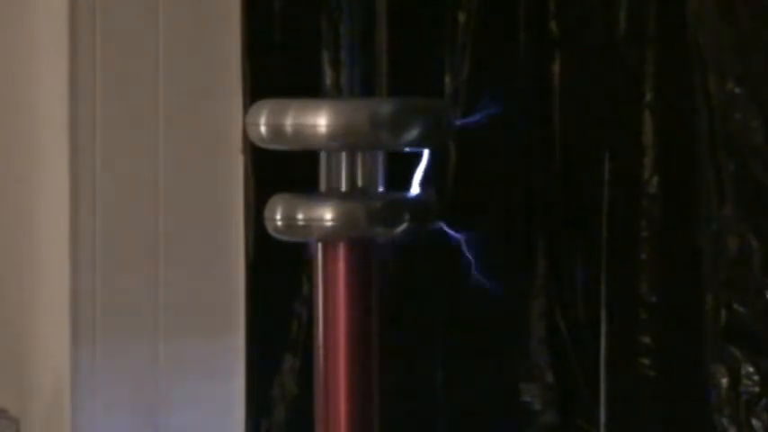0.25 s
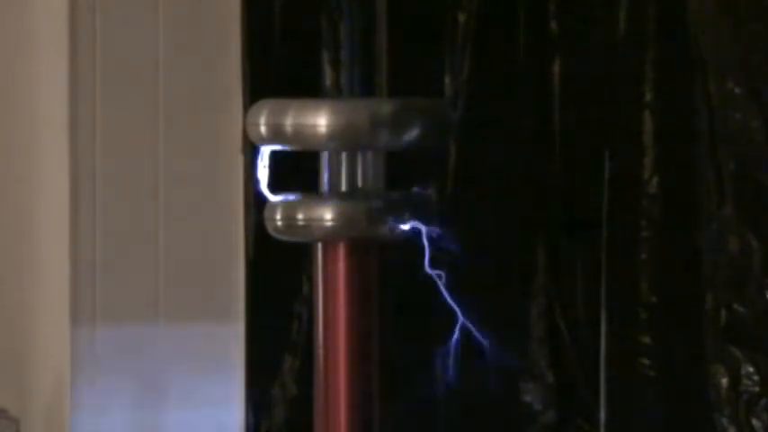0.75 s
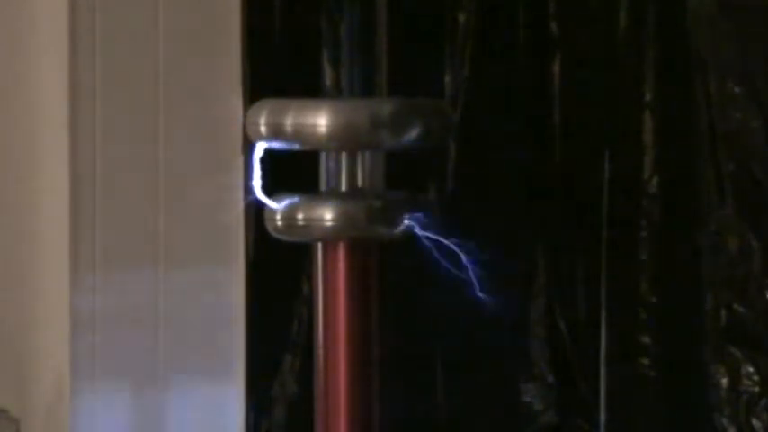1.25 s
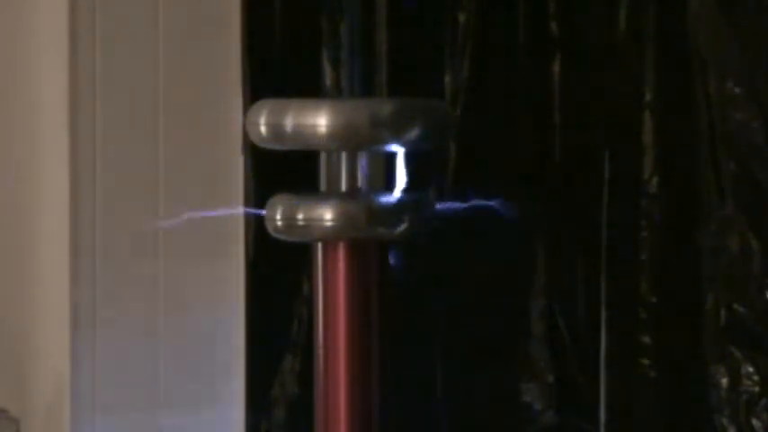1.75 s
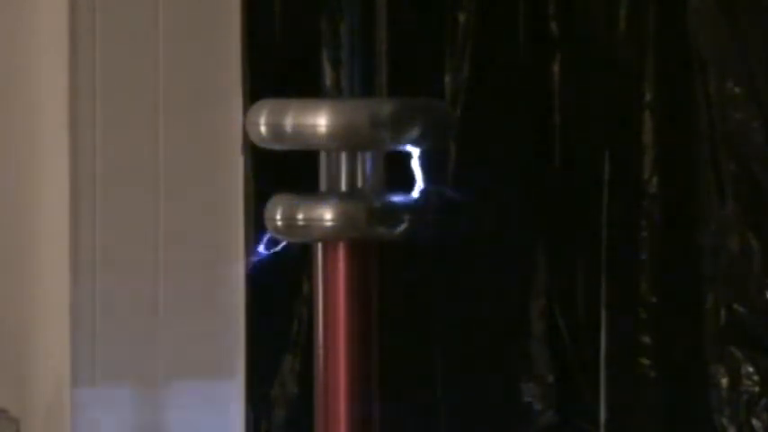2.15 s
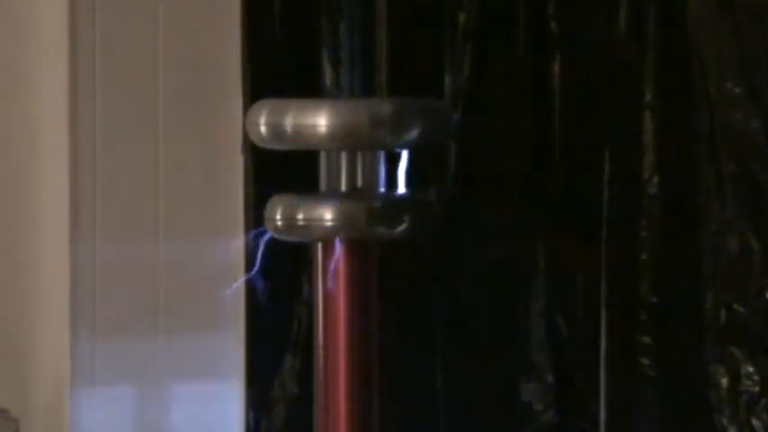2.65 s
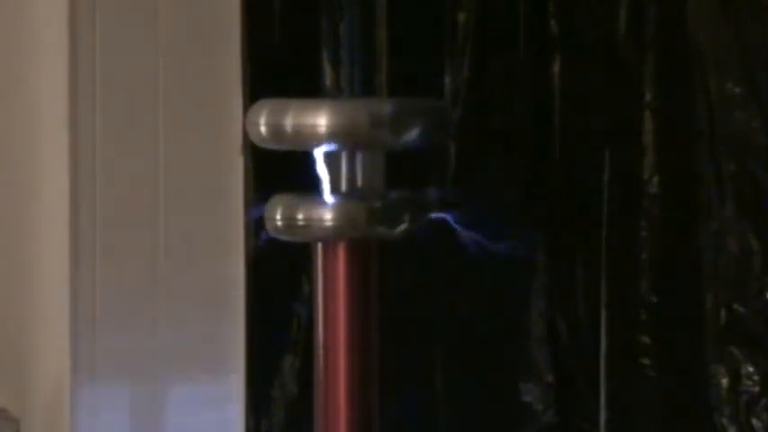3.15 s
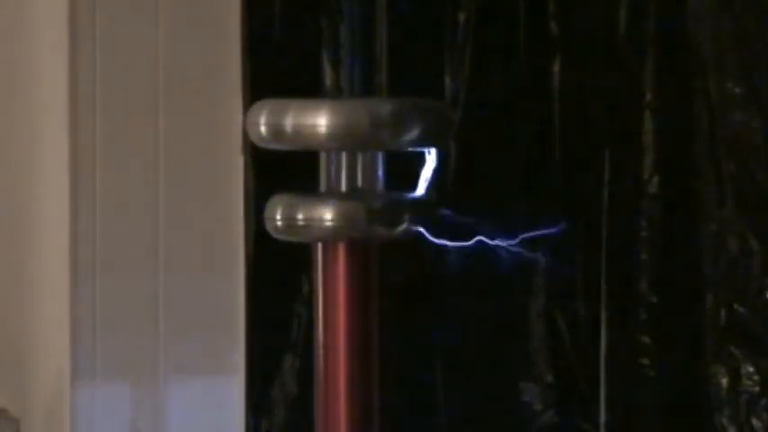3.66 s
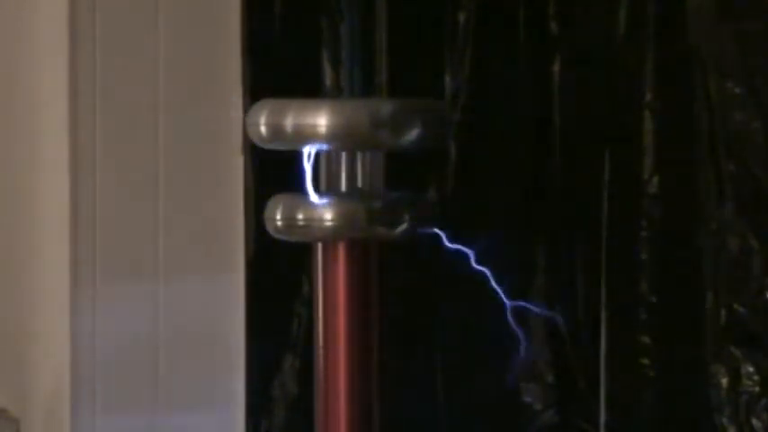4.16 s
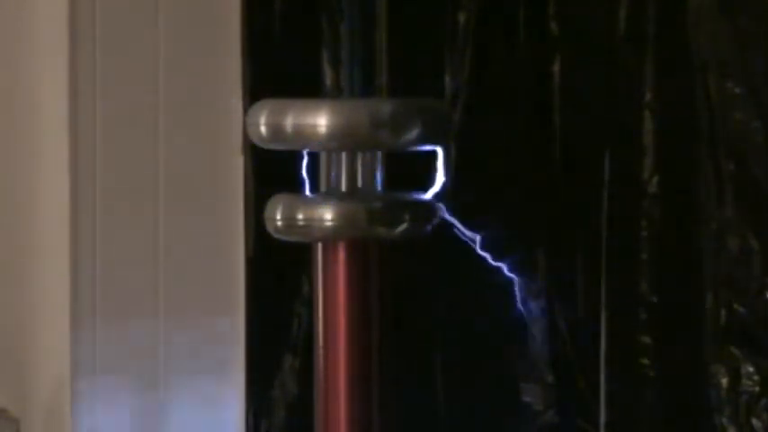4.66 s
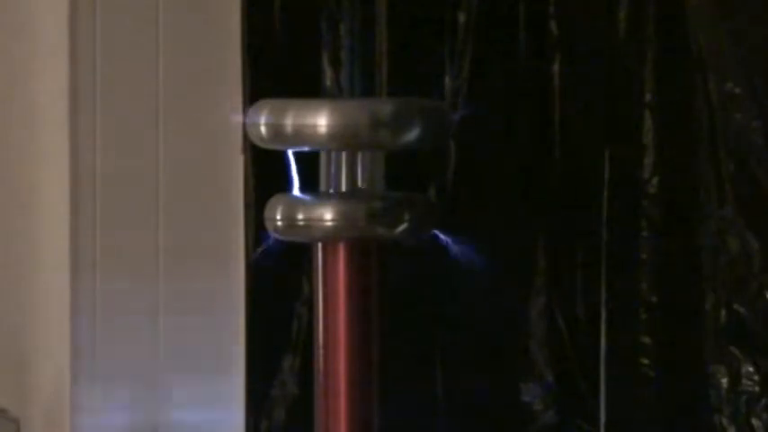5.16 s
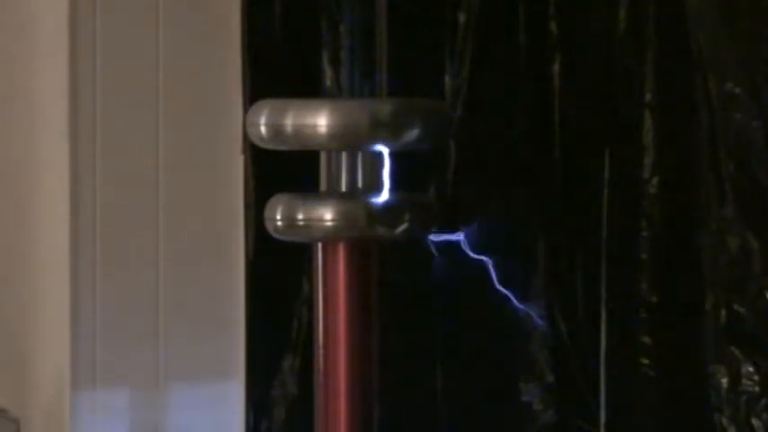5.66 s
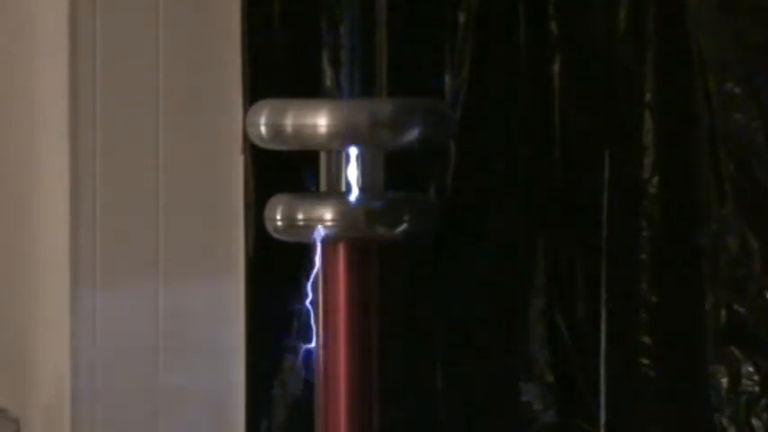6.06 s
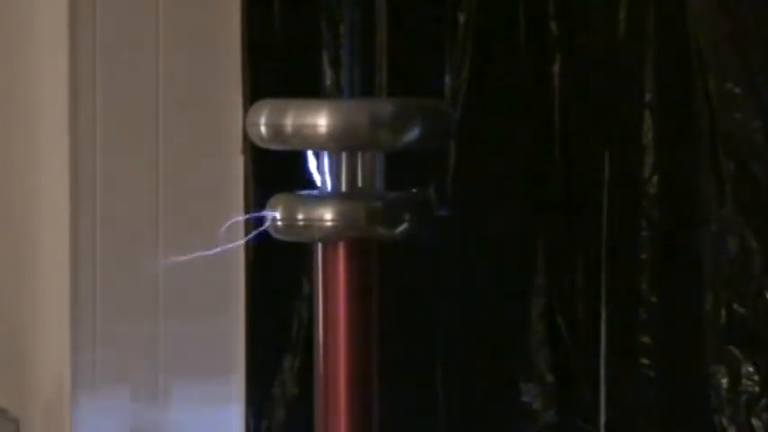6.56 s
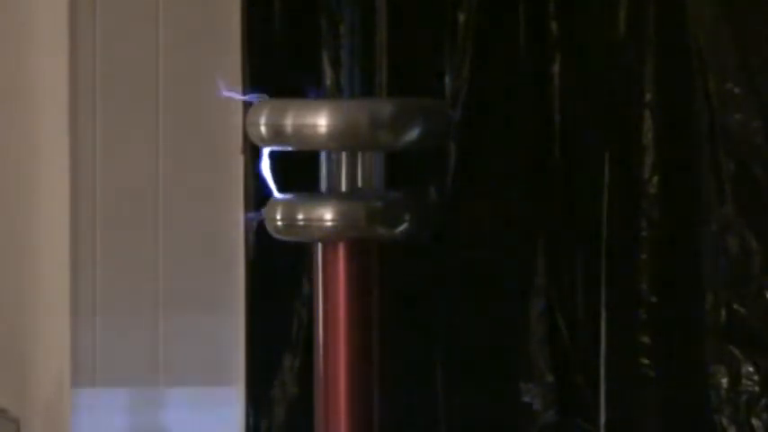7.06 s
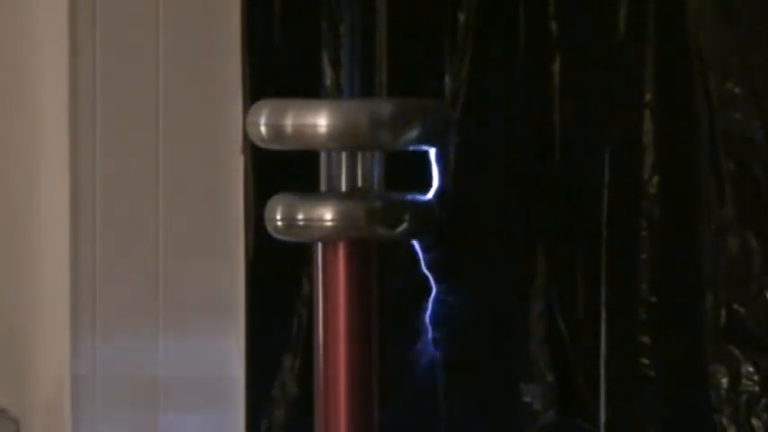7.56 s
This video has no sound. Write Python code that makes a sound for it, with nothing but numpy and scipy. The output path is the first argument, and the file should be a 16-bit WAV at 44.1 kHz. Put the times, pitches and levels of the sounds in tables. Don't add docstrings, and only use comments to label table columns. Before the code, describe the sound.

Loud raspy buzzing of electric arcs, bright and crackling, sags very slightly then rises a little in pitch over a faint low hum.

```python
import sys
import numpy as np
from scipy import signal
from scipy.fft import rfft, irfft, next_fast_len
from scipy.io import wavfile
from scipy.ndimage import uniform_filter1d

SR = 44100
rng = np.random.default_rng(int(sys.argv[2]) if len(sys.argv) > 2 else 0)


def nominal_scale(level):
    x = np.asarray(level, float) / 20
    return 10 ** x


def transcribe(u):
    v = np.clip(np.atleast_2d(u).T, -1, 1)
    q = np.round(v * 32767).astype(np.int16)
    wavfile.write(sys.argv[1], SR, q)


N = 343968


def butter(x, order, hz, kind):
    return signal.sosfilt(signal.butter(order, hz, kind, fs=SR, output="sos"), x)


def at_hz(points, hz):
    table_hz, table_db = np.transpose(points)
    return np.interp(np.log(hz + 1), np.log(table_hz), table_db)


def clicks(t_s, size):
    return np.bincount(np.clip(t_s * SR, 0, N - 1).astype(int), size, N)


# t/s, passes/Hz
GAP_SPEED = [
    (0, 186.19),
    (.45, 186.37),
    (2, 185.73),
    (3.6, 185.26),
    (4.05, 185.23),
    (4.5, 187.45),
    (5.6, 193.44),
    (6.5, 196.99),
    (7.5, 199.65),
    (7.8, 199.52),
]


def gap_passes(start_passes=-.24, charge_hz=119.985, charge_start=.31):
    t = np.arange(N) / SR
    speed_hz = np.interp(t, *np.transpose(GAP_SPEED))
    passes = start_passes + np.cumsum(speed_hz) / SR
    pass_s = np.interp(np.arange(1, passes[-1]), passes, t)
    return pass_s, pass_s * charge_hz - charge_start


def firings(lead_s=.00028, jitter_s=.00012, rise=.53, miss=.1, fall=.5, spread_db=.6, hard_db=1,
            thump_lag_s=.0004):
    t, phase = gap_passes()
    phase_chance, level_chance, time_chance = rng.standard_normal((3, len(t)))
    charge = (phase + .04 * phase_chance) % 1
    swing = np.interp(charge, [miss, miss + rise, miss + rise + fall], [0, 1, 2])
    strength = np.sin(np.pi / 2 * swing) * nominal_scale(spread_db * level_chance)
    t = t + lead_s * (.2 + np.cos(2 * np.pi * (charge - .23))) + jitter_s * time_chance
    thump_s = np.array(THUMPS)[:, 0]
    hard = np.abs(t[:, None] + thump_lag_s - thump_s).argmin(axis=0)
    strength[hard] = nominal_scale(hard_db)
    return t, strength


def arcs(t, strength, count=4, length_s=.00035, early_s=.00015, branch_db=-12, fork_db=4):
    lag_s = early_s + length_s * rng.standard_normal((len(t), count))
    forking = nominal_scale(branch_db + fork_db * rng.standard_normal((len(t), 1)))
    size = forking * rng.random((len(t), count))
    lag_s[:, 0], size[:, 0] = 0, 1
    share = size / np.linalg.norm(size, axis=1, keepdims=True)
    return t[:, None] + lag_s, strength[:, None] * share


# delay/s, level/dB, smear/s
ECHOES = [
    (.003, -10, .0003),
    (.0043, -14.5, .0003),
    (.0063, -15, .0003),
    (.0074, -15, .0003),
]
# t60/s, level/dB
TAILS = [
    (.022, -21),
    (.3, -34.5),
]


def room(count=SR, onset_s=.0008):
    t = np.arange(count) / SR
    tails = sum(nominal_scale(level_db - 60 * t / t60_s) for t60_s, level_db in TAILS)
    shape = tails * (1 - np.exp(-(t / onset_s) ** 2))
    for delay_s, level_db, smear_s in ECHOES:
        shape = shape + nominal_scale(level_db) * np.exp(-((t - delay_s) / smear_s) ** 2) / np.sqrt(smear_s * SR)
    return shape * rng.standard_normal((2, count))


# f/Hz, density/dB per Hz
SNAP = [(170, -50), (240, -20), (320, -65), (378, -22.5), (436, -26.5), (674, -17), (1220, -14),
        (2030, -6.5), (2500, -8.5), (4950, -1), (5400, -0.5), (9130, 7), (12300, 2), (15700, -6.5)]
# f/Hz, width/Hz, lift/dB
ROOM_MODES = [(270.4, 15, 29), (380, 46, 10), (462.5, 13, 13.5), (470, 34, 8), (544, 22, 13),
              (573, 37, 9.5), (630, 21, 9.5), (685.6, 9.3, 15.5), (741, 30, 5.5), (945, 41, 8),
              (1130, 50, 4), (1353, 27, 7.5), (5510, 540, 3), (7790, 350, 2.5)]


def snap_colour(hz):
    lift_db = sum(db / (1 + (2 * (hz - mode_hz) / width_hz) ** 2) for mode_hz, width_hz, db in ROOM_MODES)
    return nominal_scale(at_hz(SNAP, hz) + lift_db)


# f/Hz, side minus mid/dB
WIDTH = [(60, -14), (110, -9), (200, 5.5), (380, -15.5), (700, -12.5), (1290, -13.5), (2380, -16.5),
         (4400, -13), (8120, -13.5), (15000, -20)]


def coil(count=12, wander_per_s=3.3, near_spots=8, side_db=3, alike_hz=1300, bass_room_db=2,
         wall_db=-.3, wall_dull_hz=13000):
    dumps = firings()
    times, sizes = arcs(*dumps)
    spot = (wander_per_s * times[:, 0] + near_spots * rng.random(len(times))).astype(int) % count
    size = next_fast_len(N + SR)
    hz = np.fft.rfftfreq(size, 1 / SR)
    alike = .93 / (1 + (hz / alike_hz) ** 4)
    apart = np.sqrt(1 - alike ** 2)
    shared = nominal_scale(bass_room_db) * np.exp(-2j * np.pi * hz * [[.002], [.0045]])
    dull = nominal_scale(wall_db) / np.sqrt(1 + (hz / wall_dull_hz) ** 4)
    heard = alike * shared * rfft(clicks(*dumps), size)
    for k in range(count):
        here = spot == k
        snaps = rfft(clicks(times[here].ravel(), sizes[here].ravel()), size)
        direct = [[1], [.32 * rng.standard_normal()]]
        heard = heard + snaps * apart * (direct + dull * rfft(room(), size))
    spread = [np.ones_like(hz), nominal_scale(at_hz(WIDTH, hz) + side_db)]
    mid_side = irfft(heard * snap_colour(hz) * spread, size)
    mid_side[:, :size - N] += mid_side[:, N:]
    mid, side = mid_side[:, :N]
    return np.array([mid + side, mid - side])


# t/s, level/dB, snap body/dB
POWER = [(0, -17.5, 9), (.6, -18, 3), (1.2, -19, 3), (1.32, -16.5, 10), (2.0, -17.5, 5), (2.55, -17.5, 4),
         (3.2, -18, 7), (3.84, -18, 9), (4.2, -17, 10), (4.8, -17, 2), (5.0, -15.5, -9), (5.45, -17, 25),
         (5.75, -16.5, 9), (6.35, -17.5, 16), (6.65, -17, 17), (7.3, -17.5, 2), (7.5, -16, 17),
         (7.62, -17, 5)]


def power():
    t_s, level_db, body_db = np.transpose(POWER)
    t = np.arange(N) / SR
    return np.interp(t, t_s, level_db), np.interp(t, t_s, body_db)


def fatten(sound, body_db):
    body = butter(sound, 1, [1300, 2600], "band")
    return sound + (nominal_scale(.16 * body_db) - 1) * body


# t/s, change/dB, half length/s
SURGES = [(0.035, 1.0, 0.021), (0.125, 1.2, 0.02), (0.16, -3.5, 0.015), (0.334, -0.5, 0.015),
          (0.487, 2, 0.022), (0.705, 2.2, 0.079), (1.008, 1.3, 0.15), (1.252, -3.5, 0.018),
          (1.33, 2, 0.016), (1.436, -4, 0.02), (1.79, -2.5, 0.012), (1.897, -1.5, 0.017),
          (2.18, 2.5, 0.012), (2.385, -3.5, 0.02), (2.524, 3, 0.022), (2.57, -0.5, 0.02),
          (2.67, 1.8, 0.061), (2.913, 1.3, 0.1), (3.003, -1.1, 0.02), (3.12, 1, 0.016), (3.17, 1, 0.035),
          (3.507, 1.5, 0.15), (3.657, -2, 0.02), (3.696, 1.5, 0.018), (3.776, 1, 0.02), (3.871, -3.5, 0.03),
          (3.916, 3, 0.017), (3.97, -0.2, 0.017), (4.086, -1.5, 0.018), (4.426, 0.8, 0.041),
          (4.826, -3, 0.068), (4.948, -2, 0.035), (5.01, -0.5, 0.02), (5.255, -1.5, 0.12), (5.43, 2, 0.023),
          (5.572, -1, 0.088), (5.787, 0, 0.079), (6.053, 1.5, 0.046), (6.366, -1.5, 0.091),
          (6.725, -0.5, 0.02), (6.955, -1, 0.038), (7.32, -2, 0.038), (7.633, 3, 0.02), (7.69, -2.1, 0.12)]


def surges(depth=.63):
    t = np.arange(N) / SR
    return sum(depth * change_db * np.exp(-((t - s) / half_s) ** 2) for s, change_db, half_s in SURGES)


# t/s, peak/dB
THUMPS = [(0.034, -38), (0.0929, -43), (0.1076, -40), (0.151, -43), (0.3082, -41), (0.3508, -39.6),
          (0.5017, -44.3), (0.6847, -42), (0.8024, -37.9), (0.8771, -44.8), (0.9836, -42.5),
          (1.1026, -44.1), (1.1342, -41.4), (1.199, -40), (1.3014, -43.2), (1.6666, -38), (1.7596, -41),
          (1.7863, -41.9), (1.818, -43.2), (1.8604, -40.9), (2.0444, -42), (2.093, -35), (2.1841, -40),
          (2.274, -44.0), (2.3174, -41.2), (2.333, -43), (2.458, -41), (2.503, -43), (2.7007, -38),
          (2.7613, -39), (2.8255, -41), (3.0675, -39), (3.2664, -39.9), (3.3433, -43), (3.451, -38),
          (3.635, -40.9), (3.7103, -42), (3.7419, -44.1), (3.8343, -43.4), (3.849, -42.2), (3.8926, -43.4),
          (4.082, -42), (4.185, -43), (4.323, -41), (4.5595, -42), (4.704, -38.2), (4.7774, -39),
          (5.4845, -42), (6.1314, -44), (6.146, -42.5), (6.3698, -43), (6.8456, -44.9), (6.9856, -38),
          (7.087, -38.5), (7.2023, -41), (7.4177, -39), (7.492, -39), (7.5523, -38.3), (7.6834, -39.8),
          (7.7436, -41.2)]
# t/s, peak/dB
LESSER_THUMPS = [(0.1885, -43), (0.4102, -44), (0.5439, -43), (0.8174, -45.5), (0.8927, -44), (0.9097, -43),
                 (0.9528, -49.5), (1.1507, -46.4), (1.2588, -46.8), (1.2851, -44), (1.334, -43),
                 (1.4683, -45.5), (1.559, -43), (1.8334, -44), (1.876, -45), (1.892, -46.2),
                 (1.9244, -47.8), (1.9417, -44), (1.9526, -48), (1.9677, -44), (2.1513, -45.8),
                 (2.3511, -45.6), (2.366, -46), (2.5182, -48.0), (2.5345, -46), (2.5769, -47), (2.612, -48),
                 (2.92, -49.1), (3.1926, -43), (3.2511, -44), (3.359, -41), (3.3755, -43), (3.5289, -46.9),
                 (3.7266, -47), (3.7851, -45), (3.9576, -41), (4.018, -45.2), (4.6331, -49.9),
                 (4.761, -49.8), (4.9126, -42), (4.9506, -50), (5.1502, -48), (5.3202, -45), (5.66, -44),
                 (5.772, -45), (6.3548, -49), (6.431, -44), (6.4715, -50.0), (7.1515, -42), (7.2268, -44),
                 (7.2418, -48), (7.2525, -46), (7.3172, -46.5), (7.3277, -45), (7.343, -48.9),
                 (7.3778, -47.1), (7.4533, -46.6), (7.6431, -46), (7.7029, -47.1), (7.783, -45.1)]


def thumps(width_s=.0017, trim_db=3.5, unequal=.4, coupling_hz=35, side_hz=150):
    t_s, peak_db = np.transpose(THUMPS + LESSER_THUMPS)
    peak = nominal_scale(peak_db + trim_db)
    push = np.hanning(int(2 * width_s * SR))
    mid = np.convolve(clicks(t_s, peak), push, "same")
    side_peak = unequal * peak * rng.standard_normal(len(t_s))
    side = np.convolve(clicks(t_s, side_peak), push, "same")
    side = butter(side, 1, side_hz, "high")
    return butter(np.array([mid + side, mid - side]), 1, coupling_hz, "high")


def rectified(dry, level_db=-43, low_hz=55, high_hz=128):
    bend = dry ** 2 / np.sqrt(np.mean(dry ** 2))
    return nominal_scale(level_db) * butter(bend, 5, [low_hz, high_hz], "band")


def rumble(level_db=-70, low_hz=30, high_hz=140):
    noise = rng.standard_normal(N) + .23 * rng.standard_normal((2, N))
    band_gain = np.sqrt(SR / 2 / (high_hz - low_hz))
    return nominal_scale(level_db) * band_gain * butter(noise, 2, [low_hz, high_hz], "band")


def scene():
    level_db, body_db = power()
    sound = fatten(coil(), body_db)
    swell = uniform_filter1d(np.mean(sound ** 2, axis=0), size=SR // 28, mode="reflect")
    return sound * nominal_scale(level_db + surges() + .3) / np.sqrt(swell)


def band_limit(x):
    return signal.sosfilt(signal.butter(12, 16290, fs=SR, output="sos"), x)


def record(dry, ceiling=1.1, bass_hz=255, cutoff_hz=16050):
    rounded = ceiling * np.tanh(dry / ceiling)
    thin = butter(rounded, 6, bass_hz, "high")
    mix = thin + thumps() + rectified(dry) + rumble()
    top_cut = signal.cheby2(24, 70, cutoff_hz, fs=SR, output="sos")
    return band_limit(signal.sosfilt(top_cut, mix))


dry = scene()
out = record(dry)
transcribe(out)
```